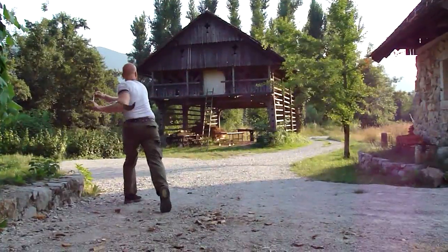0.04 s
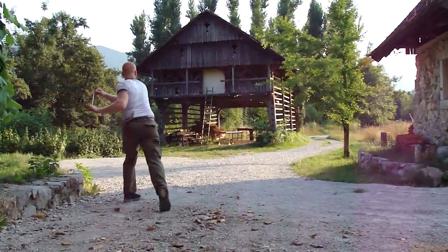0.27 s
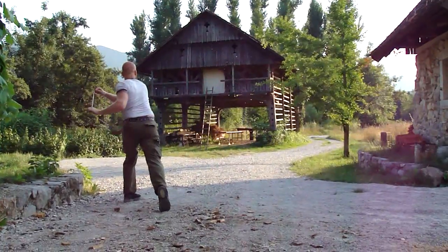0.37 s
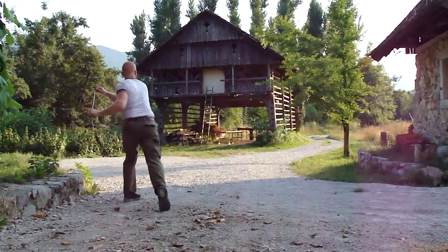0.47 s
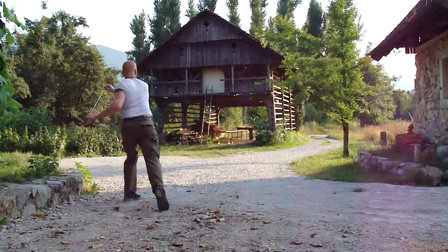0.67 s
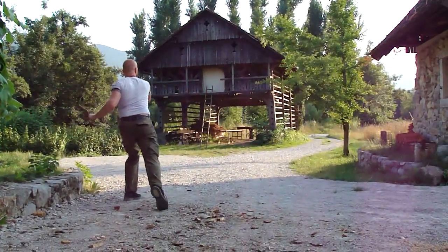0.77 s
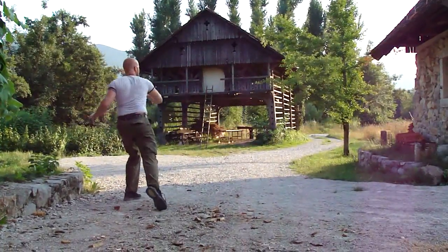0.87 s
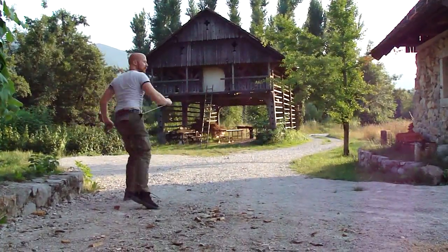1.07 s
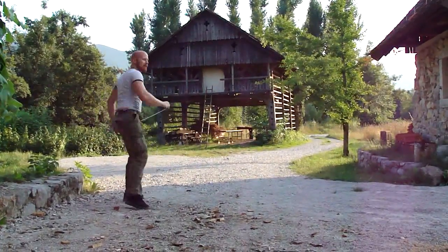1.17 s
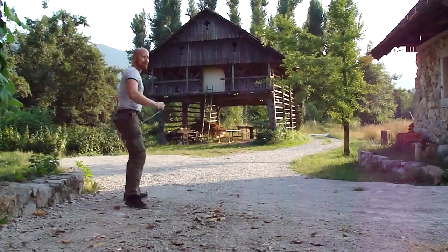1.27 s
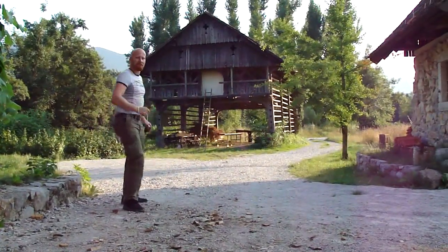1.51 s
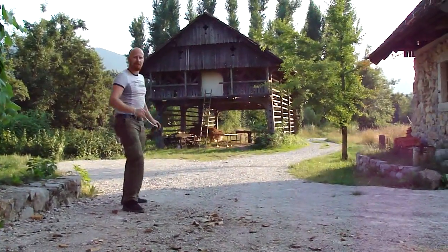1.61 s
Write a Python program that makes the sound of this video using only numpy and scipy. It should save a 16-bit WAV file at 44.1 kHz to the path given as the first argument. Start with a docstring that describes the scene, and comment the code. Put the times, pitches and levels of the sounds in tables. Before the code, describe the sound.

One sharp crack of stone on wood slightly overloads the microphone and scatters off buildings and trees. Softer footwork follows, with gravel crunching and grinding, small pebbles snapping and a quick, close double clack, in a quiet open yard.

```python
"""Stone on wood in a gravel farmyard.

A stone hits wood with a sharp crack; the wood rings, and buildings and trees scatter a dense echo.
The thrower shifts his feet and pivots: gravel crunches and grinds, single pebbles snap.
Two hard clacks sound close by. Faint outdoor air lies underneath."""
import sys
import numpy as np
from scipy import signal
from scipy.fft import rfft, irfft, next_fast_len
from scipy.io import wavfile
from scipy.ndimage import map_coordinates

SR = 44100
rng = np.random.default_rng(int(sys.argv[2]) if len(sys.argv) > 2 else 0)


def wav_record(signal):
    """Record a signal, one row per channel, as 16-bit PCM in the file named by sys.argv[1]."""
    frames = np.transpose(np.atleast_2d(signal))
    bounded = np.clip(frames, -1, 1)
    # unit amplitude maps onto the largest positive 16-bit level
    quanta = np.round(bounded * 32767).astype(np.int16)
    wavfile.write(sys.argv[1], SR, quanta)


N = 72765
TOP_HZ = 11030

# Stone-on-wood contacts. Each row: start in seconds, level in dB.
BLOW_CONTACTS = [(0.2074, 0.5), (0.2086, -9)]
# Spectrum of the crack. Each row: frequency in Hz, relative level in dB.
CRACK_SPECTRUM = [(50, -17), (150, -12.5), (600, -5), (1500, -0.5), (2200, 4.5), (3000, -2.5), (3800, 1.5),
                  (5000, -5.5), (5800, -6.5), (7500, -5.5), (9300, -17), (10200, -15), (11000, -28),
                  (14000, -36)]
# Spectrum of a pebble's tick. Each row: frequency in Hz, relative level in dB.
PEBBLE_SPECTRUM = [(200, -33), (1000, -5), (2400, 11), (4500, 3.5), (7000, -2.5), (9000, -10),
                   (11000, -27.5)]


def amp(db):
    """Decibels to gain."""
    return 10 ** (np.asarray(db) / 20)


def unit(x):
    """Scale to rms 1."""
    return x / np.sqrt(np.mean(x ** 2) + 1e-20)


def along(points, hz):
    """Interpolate (Hz, value) points on a log axis."""
    knots_hz, values = np.transpose(points)
    return np.interp(np.log(hz + 1), np.log(knots_hz + 1), values)


def since(start_s):
    """Seconds since start_s, zero before it."""
    return np.maximum(np.arange(N) / SR - start_s, 0)


def wobble(knots_per_s):
    """Smooth random curve."""
    knots = rng.standard_normal(int(N * knots_per_s / SR) + 4)
    return map_coordinates(knots, [np.arange(N) * knots_per_s / SR])


def fader(points):
    """Gain per sample from (s, dB) points."""
    return amp(np.interp(np.arange(N) / SR, *np.transpose(points)))


def filtered(x, response):
    """Apply a frequency response to x."""
    size = next_fast_len(N + SR // 10, True)
    return irfft(rfft(x, size) * response(np.fft.rfftfreq(size, 1 / SR)), size)[:N]


def coloured(x, spectrum):
    """Shape x by a spectrum, cut at TOP_HZ, scale to rms 1."""
    return unit(filtered(x, lambda hz: amp(along(spectrum, hz)) * (hz < TOP_HZ)))


def click(spectrum, size=2048):
    """Minimum-phase click of peak 1."""
    cepstrum = irfft(np.log(amp(along(spectrum, np.fft.rfftfreq(size, 1 / SR)))))
    cepstrum[1:size // 2] *= 2
    cepstrum[size // 2 + 1:] = 0
    pulse = irfft(np.exp(rfft(cepstrum)))
    return pulse / np.abs(pulse).max()


def impulses(rows):
    """One impulse per (s, dB) row."""
    start_s, db = np.transpose(rows)
    return np.bincount(np.round(start_s * SR).astype(int), amp(db), N)[:N]


def add(track, start_s, sound):
    """Mix a sound into the track."""
    part = track[round(start_s * SR):][:len(sound)]
    part += sound[:len(part)]


def ringing(modes, t):
    """Damped (Hz, dB, T60 s) modes at random phases."""
    return sum(amp(db - 60 * t / t60_s) * np.sin(2 * np.pi * (hz * t + rng.random()))
               for hz, db, t60_s in modes)


def air(level_db=-52.5):
    """Near-steady outdoor background noise."""
    # Air spectrum. Each row: frequency in Hz, relative level in dB.
    spectrum = [(25, -24), (45, -31), (85, -10.5), (135, 1), (200, -6), (300, 3), (420, -3.5), (620, -3),
                (1000, -9.5), (1350, -6.5), (1900, -12.5), (3300, -7), (5000, -12), (11000, -17.5)]
    return amp(level_db + 0.2 * wobble(14)) * coloured(rng.standard_normal(N), spectrum)


def pebbles(rattle_gain=0.039, rattle_t60_s=0.021):
    """Single stones snap under a shoe and rattle briefly."""
    # Pebble snaps. Each row: start in seconds, level in dB.
    snaps = [(0.0425, -34), (0.1035, -33), (0.7013, -27), (0.7212, -20), (0.8075, -29), (0.9045, -30),
             (0.9545, -25), (1.057, -22), (1.114, -20), (1.127, -20), (1.3452, -19), (1.373, -17),
             (1.597, -30)]
    t = np.arange(SR // 20) / SR
    hits = impulses(snaps)
    for start_s, db in snaps:
        rattle = rattle_gain * amp(db - 60 * t / rattle_t60_s) * rng.standard_normal(len(t))
        add(hits, start_s, rattle)
    return signal.oaconvolve(hits, click(PEBBLE_SPECTRUM))[:N]


def dispersed_crack(delay_s=0.000703, ref_hz=2010, size=2048):
    """One contact, peak 1. Bending waves in the wood take delay_s at ref_hz; treble travels fastest."""
    hz = np.fft.rfftfreq(size, 1 / SR)
    lag_cycles = 2 * delay_s * np.sqrt(hz * ref_hz)
    pulse = irfft(rfft(click(CRACK_SPECTRUM)) * np.exp(-2j * np.pi * lag_cycles))[:size // 2]
    return pulse / np.abs(pulse).max()


def blow(ground_db=-15, ground_t60_s=0.058, wood_rise_s=0.0063):
    """Stone hits wood: hard contacts, a spray of ground reflections, ringing modes."""
    # Modes of the wood. Each row: frequency in Hz, level in dB, T60 in seconds.
    wood_modes = [(303, -38, 0.56), (350, -35, 1), (405.6, -33.5, 0.86), (554, -41, 0.36), (579, -29, 0.91),
                  (639.4, -24.5, 0.61), (780, -25, .55), (849, -16.5, 0.23), (874.5, -25, 0.61),
                  (966, -30, .45), (1090, -21.5, .45), (1146, -26, 0.59), (1394, -24, 0.45),
                  (1436, -30, 0.13), (1580, -27.5, 0.3), (1902, -19, 0.32), (2044, -29, 0.36),
                  (2430, -25, 0.23), (2500, -26, 0.45), (3160, -28.5, 0.5)]
    t = np.arange(SR // 2) / SR
    out = signal.oaconvolve(impulses(BLOW_CONTACTS), dispersed_crack())[:N]
    spray = coloured(rng.standard_normal(N), CRACK_SPECTRUM)[:len(t)]
    spray *= amp(ground_db - 60 * t / ground_t60_s)
    ring = ringing(wood_modes, t) * (1 - np.exp(-t / wood_rise_s))
    add(out, BLOW_CONTACTS[0][0], spray + ring)
    return out


def yard_echo(scatter_db=0.9, scatter_knots_per_s=140):
    """Buildings and trees scatter the blow into uneven arrivals; each band swells, holds and dies."""
    # Echo bands. Each row: centre in Hz, level in dB, then rise, hold and T60 in seconds.
    bands = [(50, -66, 0.0012, 0.056, .6), (162, -44, 0.0092, 0.063, 1), (334, -31, 0.018, .12, 0.51),
             (567, -20.5, 0.057, 0.091, 0.49), (810, -24, 0.005, 0.095, 0.63),
             (1340, -24, 0.0037, 0.074, 0.55), (2080, -27, 0.0012, 0.078, 0.57),
             (3060, -25, 0.00061, 0.082, 0.54), (5280, -36, 0.00058, 0.095, 0.52),
             (9700, -46.5, 0.00082, 0.039, 0.57)]
    centres_hz = [row[0] for row in bands]
    t = since(BLOW_CONTACTS[0][0])
    out = np.zeros(N)
    for weights, (_, db, rise_s, hold_s, t60_s) in zip(np.eye(len(bands)), bands):
        triangle = list(zip(centres_hz, weights))
        band = filtered(rng.standard_normal(N), lambda hz: along(triangle, hz) ** 0.97 * (hz < TOP_HZ))
        decay = amp(db - 60 * np.maximum(t - hold_s, 0) / t60_s)
        out += unit(band) * (1 - np.exp(-t / rise_s)) * decay
    return out * amp(scatter_db * wobble(scatter_knots_per_s))


def grains(clump_db, rate_per_s=5000, spread_db=1):
    """Dense, clumped contacts of small stones."""
    contacts = (rng.random(N) < rate_per_s / SR) * rng.choice([-1, 1], N)
    return contacts * amp(spread_db * rng.standard_normal(N) + clump_db * wobble(110))


def crunch():
    """Gravel crunches brightly under shifting soles."""
    # Crunch spectrum. Each row: frequency in Hz, relative level in dB.
    spectrum = [(300, -27), (900, -4), (1500, -3.5), (2400, 0.5), (3400, -2.5), (5000, -8.5), (6500, -12),
                (8000, -18), (11000, -21.5)]
    # Crunch envelope. Each row: time in seconds, level in dB.
    envelope = [(0.6, -57), (0.71, -47), (0.76, -45.5), (0.83, -43.5), (0.89, -46), (0.95, -43),
                (0.99, -40), (1.035, -43), (1.07, -33.5), (1.13, -35.5), (1.2, -36.5), (1.3, -34),
                (1.375, -29), (1.45, -32), (1.56, -46), (1.65, -45.5)]
    return coloured(grains(clump_db=0.9), spectrum) * fader(envelope)


def grind():
    """Low grinding as the weighted sole turns."""
    # Grind spectrum. Each row: frequency in Hz, relative level in dB.
    spectrum = [(60, -43), (150, -34), (260, -9.5), (400, -4.5), (600, 4), (900, 0), (1300, 2.5),
                (2000, -3.5), (4000, -47), (11000, -53)]
    # Grind envelope. Each row: time in seconds, level in dB.
    envelope = [(0.65, -54), (0.8, -47), (1.03, -58.5), (1.13, -43), (1.22, -37.5), (1.3, -32), (1.37, -30),
                (1.45, -32), (1.53, -39), (1.65, -44.5)]
    return coloured(grains(clump_db=1.35), spectrum) * fader(envelope)


def scuffs(rise_s=0.0015):
    """Short strokes of a sole over gravel."""
    # Sole strokes. Each row: start in seconds, level in dB, T60 in seconds.
    strokes = [(0.727, -36.5, .09), (0.825, -39, .11), (0.905, -42, .13), (0.959, -35, .09),
               (1.06, -33, 0.11), (1.112, -40, .08), (1.599, -39, 0.084)]
    # Scuff spectrum. Each row: frequency in Hz, relative level in dB.
    spectrum = [(300, -23), (1400, -22), (2400, 3), (3000, -10), (3800, -2.5), (6000, -18), (11000, -26)]
    envelope = np.zeros(N)
    for start_s, db, t60_s in strokes:
        t = since(start_s)
        envelope += (1 - np.exp(-t / rise_s)) * amp(db - 60 * t / t60_s)
    return coloured(grains(clump_db=0.5), spectrum) * envelope


def scrape():
    """Hollow scrape as the foot comes down: grains drive resonances of alternating sign."""
    # Scrape resonances. Each row: centre in Hz, width in Hz, relative level in dB.
    resonances = [(279.3, 35, -0.5), (540, 69, 2), (610, 71, 4), (740, 47, 0), (868, 26, 6),
                  (1140, 270, -6)]
    # Scrape envelope. Each row: time in seconds, level in dB.
    envelope = [(0.6, -61), (0.865, -59), (0.885, -46.5), (0.92, -59), (1.08, -51), (1.14, -43.5),
                (1.17, -32.5), (1.26, -31), (1.3, -39), (1.33, -33), (1.42, -36), (1.65, -56.5)]

    def hollow(hz):
        return sum((-1) ** k * amp(db) * 1j * hz * width / (centre ** 2 - hz ** 2 + 1j * hz * width)
                   for k, (centre, width, db) in enumerate(resonances))

    return unit(filtered(grains(clump_db=2.0), hollow)) * fader(envelope)


def clacks(rise_s=0.00013, highpass_hz=600):
    """Two quick contacts, each a tick and a short ring, of a hard piece too small to radiate bass."""
    # Contacts. Each row: start in seconds, ring level in dB, tick level in dB, dulling in dB per kHz.
    contacts = [(1.2808, -7.5, -22, .7), (1.29, -6, -8, 0)]
    # Modes of the piece. Each row: frequency in Hz, relative level in dB, T60 in seconds.
    modes = [(1250, -12, .024), (1620, -8, .013), (1900, -12, .022), (2650, -7, 0.013), (3230, 1.5, .019),
             (3500, -10, 0.0099), (4300, -14.5, .011), (5560, -13, .007), (6840, -16, .005),
             (9200, -20, .004), (10050, -14.5, 0.0063)]
    t = np.arange(SR // 20) / SR
    ticks = impulses([(start_s, tick_db) for start_s, _, tick_db, _ in contacts])
    out = signal.oaconvolve(ticks, click(PEBBLE_SPECTRUM))[:N]
    for start_s, ring_db, _, dull_db_per_khz in contacts:
        dulled = [(hz, ring_db + db - dull_db_per_khz * hz / 1000, t60_s) for hz, db, t60_s in modes]
        add(out, start_s, (1 - np.exp(-t / rise_s)) * ringing(dulled, t))
    return signal.sosfilt(signal.butter(2, highpass_hz, "high", fs=SR, output="sos"), out)


def scene():
    """Mono mix: the blow and its echo, clacks and footwork, over outdoor air."""
    mix = blow() + yard_echo() + clacks() + crunch() + grind() + scuffs() + scrape() + pebbles() + air()
    return mix[None]


def record(dry):
    """The microphone overloads on the crack; a steep low-pass cuts above TOP_HZ."""
    ceiling = 0.93
    clipped = dry[0] / (1 + np.abs(dry[0] / ceiling) ** 6) ** (1 / 6)
    return filtered(clipped, lambda hz: amp(-np.clip((hz - TOP_HZ) / 8, 0, 120)))[None]


dry = scene()
out = record(dry)
wav_record(out)
```